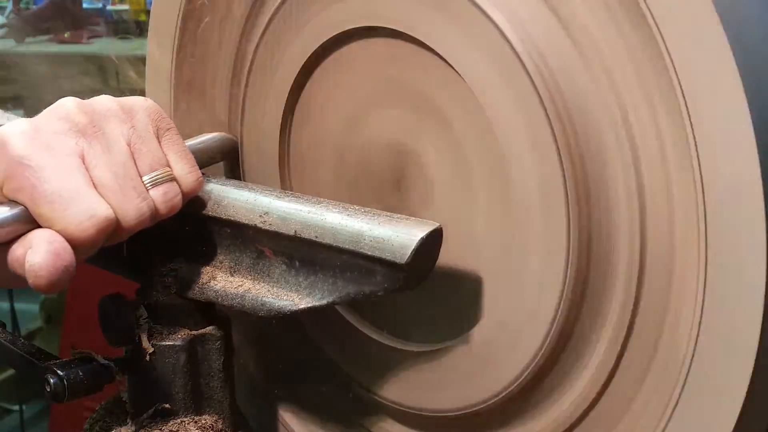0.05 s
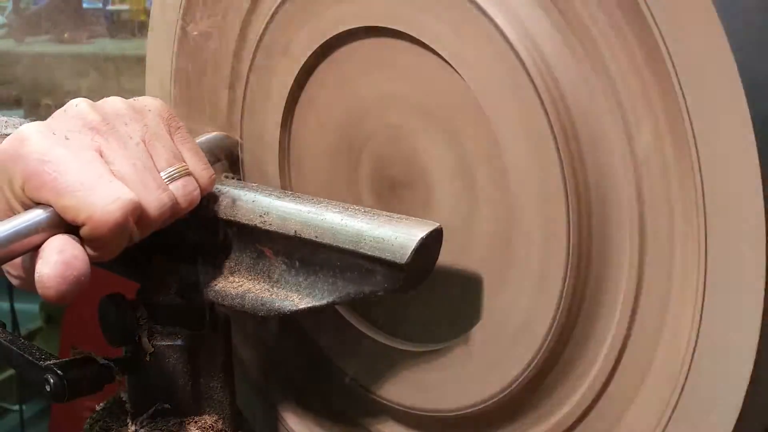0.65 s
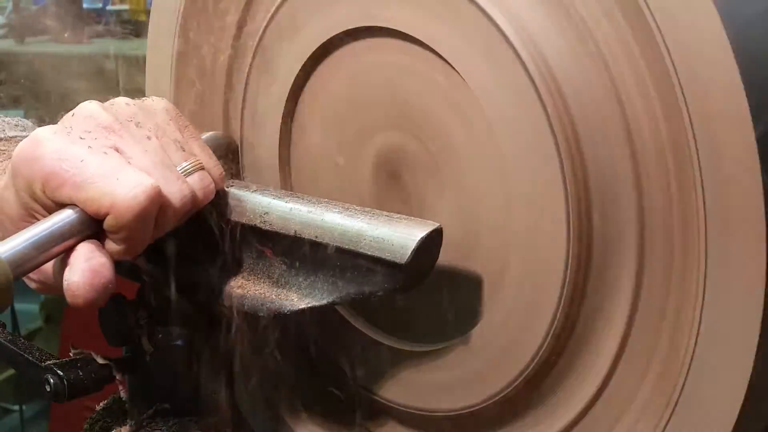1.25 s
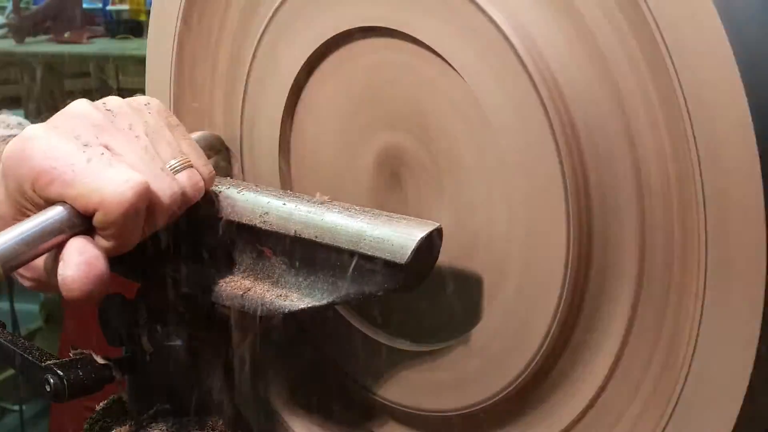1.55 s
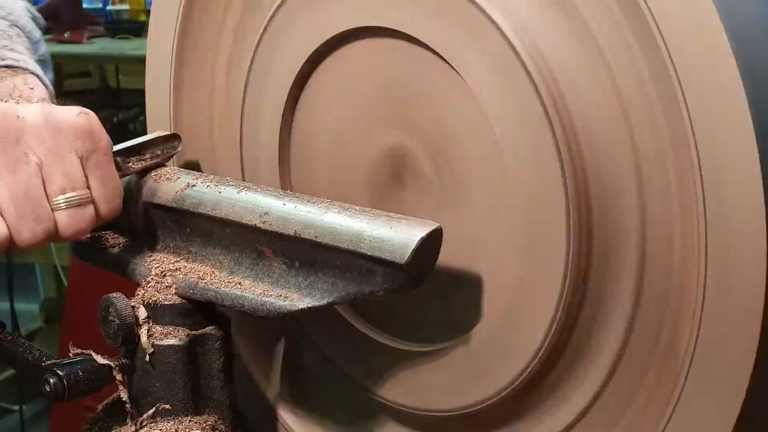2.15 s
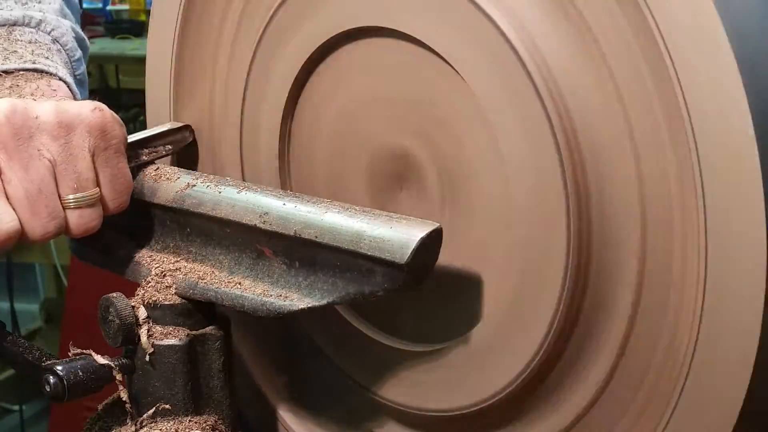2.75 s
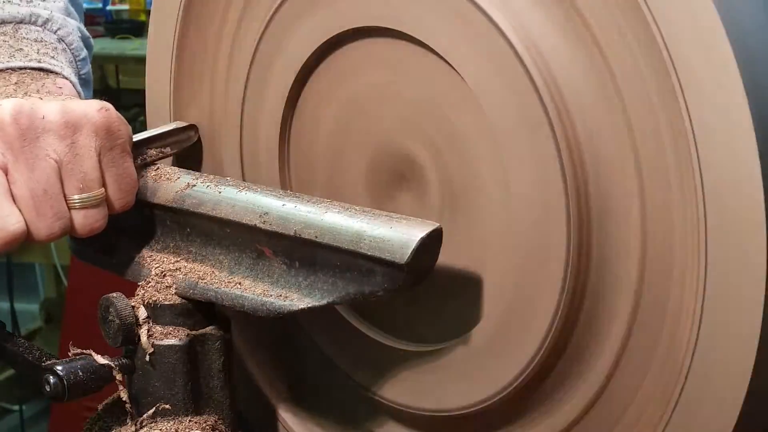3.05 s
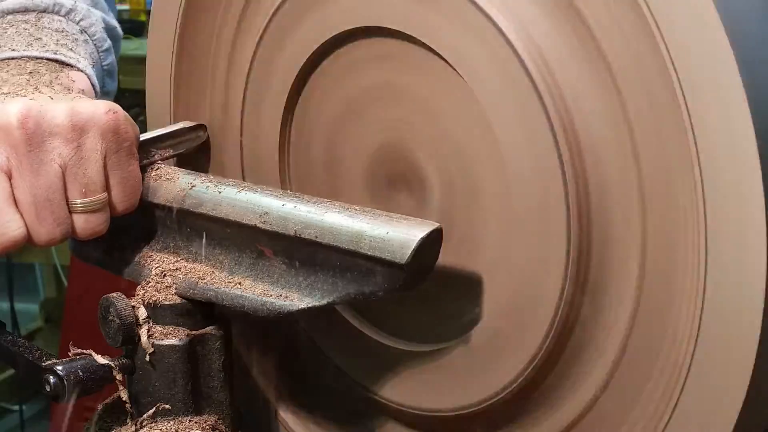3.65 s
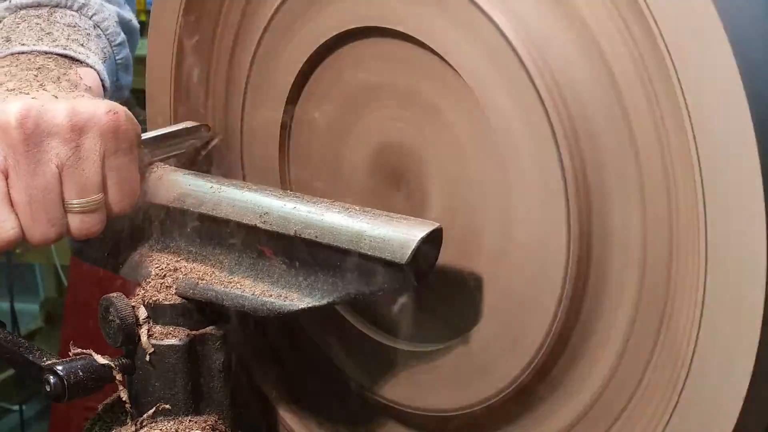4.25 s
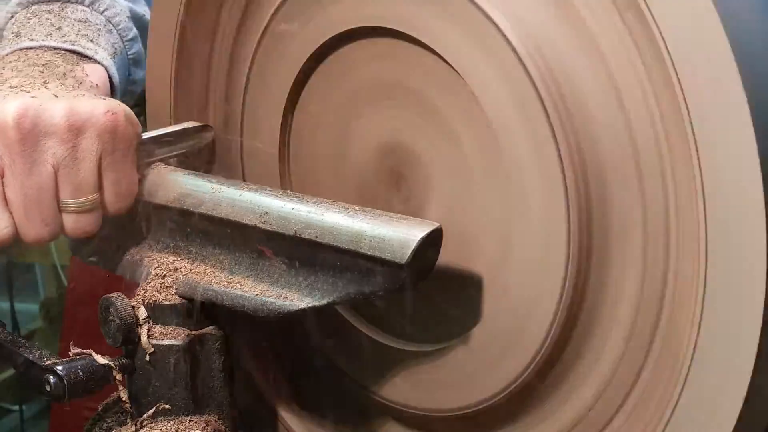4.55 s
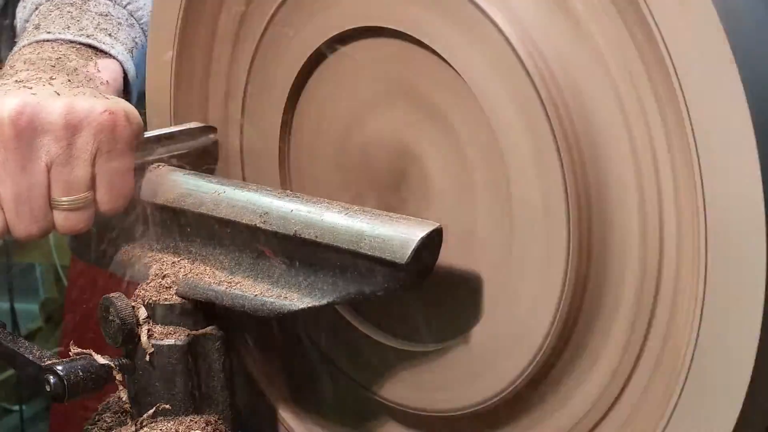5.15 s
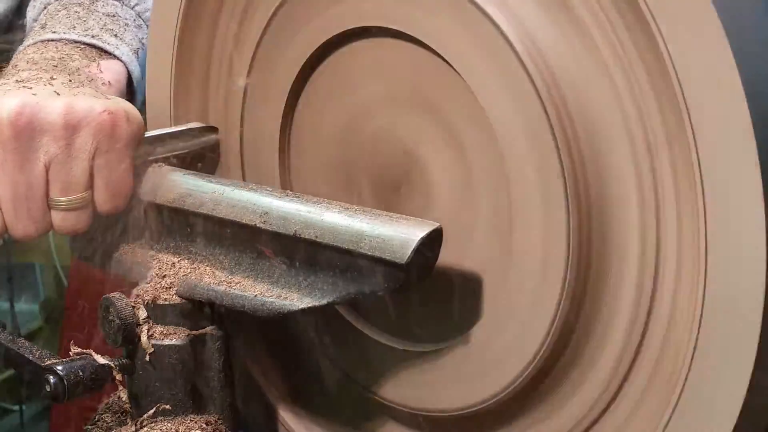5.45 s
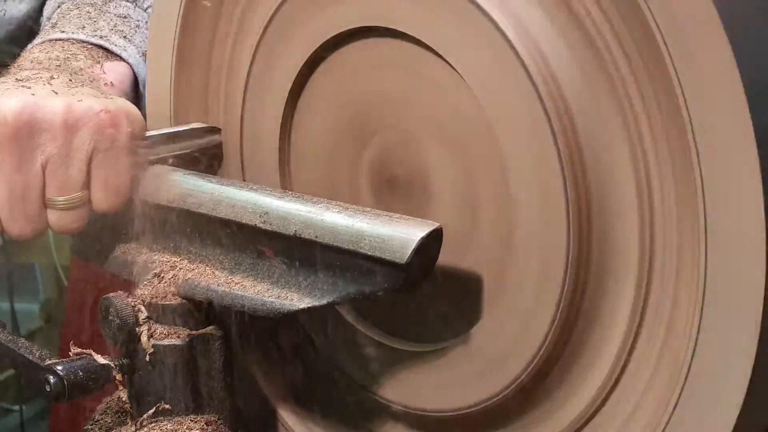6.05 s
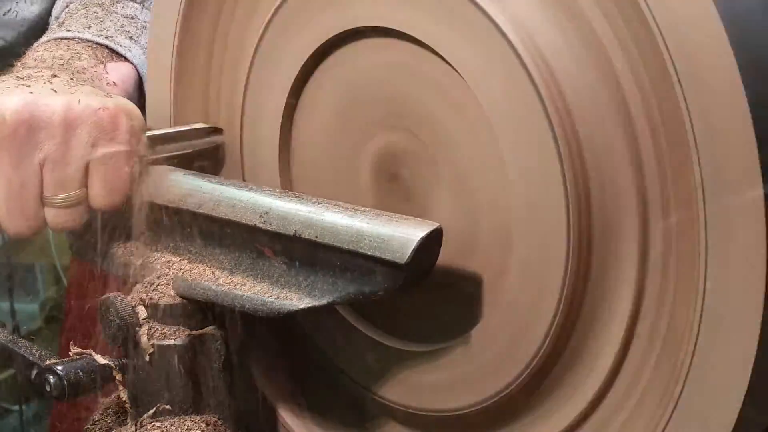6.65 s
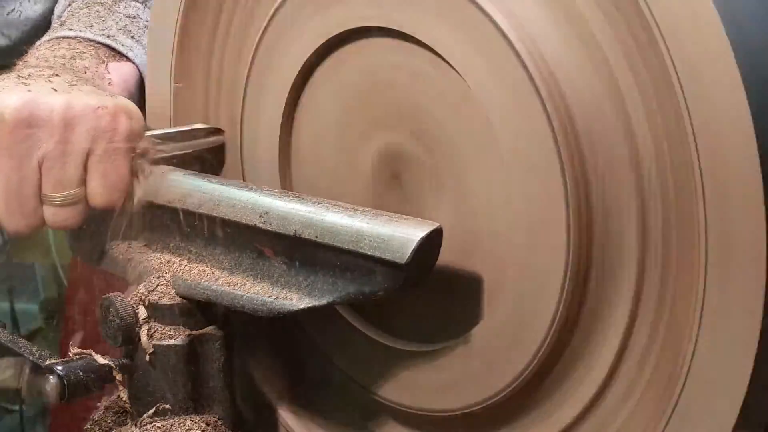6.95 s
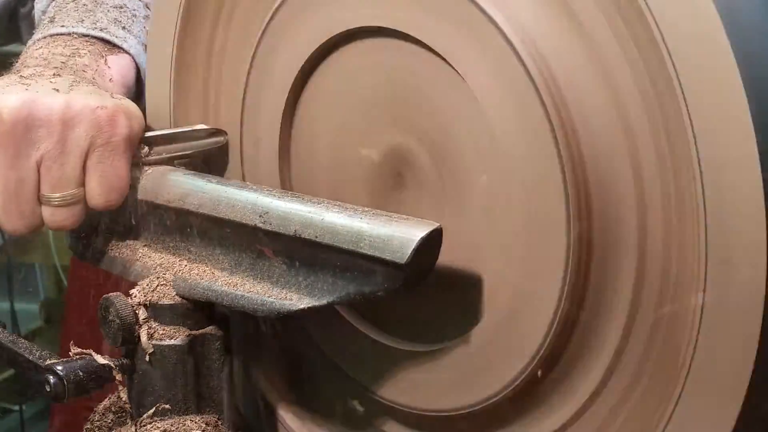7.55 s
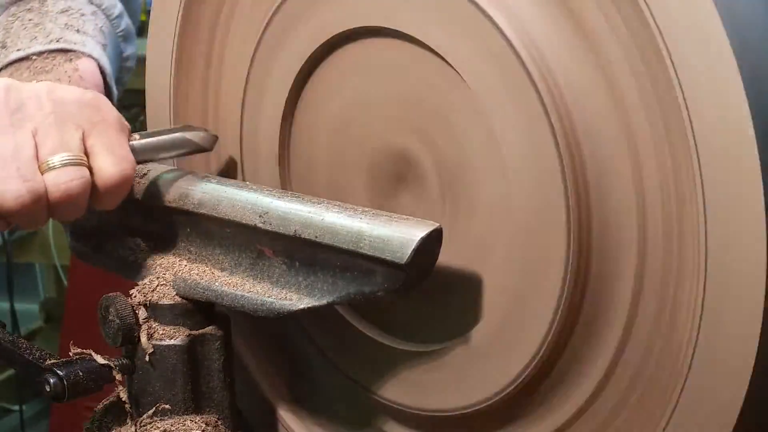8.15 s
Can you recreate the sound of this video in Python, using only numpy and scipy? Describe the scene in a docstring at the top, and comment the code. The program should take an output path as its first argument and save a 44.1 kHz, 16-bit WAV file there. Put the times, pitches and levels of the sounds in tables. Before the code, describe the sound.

A gouge is already cutting a wooden bowl blank on a lathe, close by in a small workshop: a rasping scrape and hiss of shavings, stronger on the left, throbbing rapidly as the wood turns. At about 1.5 seconds the tool lifts with a few light knocks, leaving a faint motor drone and a thin, very high whine. These grow louder around 2.5 seconds as the gouge slides softly along its metal rest. At 2.8 seconds it bumps the wood and starts a longer cut, which chatters with a ringing tone around 4 seconds. Faint squeals swell and fade within the scrape, and the pulsing hiss carries on with a low judder. From about 6.9 seconds rapid ticks join in, until the cut ends near 7.6 seconds. A flying chip hits the microphone with a sharp tick and dull thump at 7.8 seconds, and the motor runs on quietly.

```python
"""A gouge takes two cuts from a big bowl blank spinning on a lathe, close by in a small workshop.
Tearing fibres force the modes of the lathe, wood, tool rest and gouge, and the shaving hisses; the sound
throbs as the rim's hard grain and hollows come round. Stick-slip squeals, and the second cut chatters
briefly and ends in ticks and a flying chip. Between the cuts the tool knocks and slides on the rest.
Under it all the motor drones and its inverter whines."""
import sys
import numpy as np
from scipy import signal
from scipy.fft import rfft, irfft, next_fast_len
from scipy.io import wavfile
from scipy.ndimage import uniform_filter1d, map_coordinates

SR = 44100
rng = np.random.default_rng(int(sys.argv[2]) if len(sys.argv) > 2 else 0)


def inscribe(sig):
    """Save sig as 16-bit PCM at rate SR to the path in sys.argv[1].

    A 1-D sig is mono; a 2-D sig holds one channel per row.
    Samples are clipped to [-1, 1] before scaling.
    """
    pcm = np.round(np.clip(np.atleast_2d(sig).T, -1, 1) * 32767)
    wavfile.write(sys.argv[1], SR, pcm.astype(np.int16))


N = 370866
TIME = np.arange(N) / SR
SIZE = 2 * next_fast_len(N // 2 + SR // 4)
HZ = np.fft.rfftfreq(SIZE, 1 / SR)
SPIN_HZ = 13.14

# the cuts: (start t/s, end t/s, release through 20 dB t/s, turn-to-turn correlation of the surface)
CUTS = [(-.1, 1.468, 0.11, 0.32), (2.776, 7.648, 0.15, 0.78)]
# normal modes: (f/Hz, bandwidth f/Hz, relative level/dB in the first cut, in the second)
BLANK_MODES = [(329, 17.4, 4, -5), (463, 18, 0.5, 0.5), (522, 24, 1, -10.5), (662, 64, -2, -10.5),
               (757, 29, 0, -9), (814.9, 8.6, 6, 2), (960, 87, -3, -9.5)]
REST_MODES = [(1508, 71, -5.5, 0), (1612, 69, -5.5, 2.5), (2210, 210, -10, -9.5), (2501, 210, -4, -1)]
GOUGE_MODES = [(3430, 280, 0, 5.5), (3947, 450, -0.097, -11), (4292, 210, 0.6, 4),
               (4590, 200, -0.89, -25.5)]


def gain_of(db):
    """Amplitude ratio of a level in decibels."""
    return 10 ** (np.asarray(db) / 20)


def unit_rms(x):
    """Normalisation to unit mean power."""
    return x / np.sqrt(np.mean(abs(x) ** 2) + 1e-20)


def bell(middle, half):
    """Gaussian envelope of peak 1."""
    return np.exp(-((TIME - middle) / half) ** 2 / 2)


def ramp(start, length):
    """Linear rise from 0 to 1."""
    return np.clip((TIME - start) / length, 0, 1)


def over_time(rows):
    """Linear interpolation of each column in time."""
    times, *columns = np.transpose(rows)
    return [np.interp(TIME, times, c) for c in columns]


def over_frequency(rows):
    """Interpolation of each column in log frequency."""
    hz, *columns = np.transpose(rows)
    return [np.interp(np.log(HZ + 1), np.log(hz + 1), c) for c in columns]


def filtered(x, response):
    """Convolution as a product of spectra."""
    return irfft(rfft(x, SIZE) * response, SIZE)[..., :N]


def noise(response):
    """Spectrally shaped Gaussian noise of rms 1."""
    return unit_rms(filtered(rng.standard_normal(N), response))


def wander(rate_hz):
    """Low-pass random modulation of rms 1."""
    return noise(1 / (1 + (HZ / rate_hz) ** 4))


def causal(gain):
    """Minimum-phase response of unit power: it rings only after it is struck."""
    cepstrum = irfft(np.log(np.maximum(unit_rms(gain), 1e-5)))
    cepstrum[1:SIZE // 2] *= 2
    cepstrum[SIZE // 2 + 1:] = 0
    return np.exp(rfft(cepstrum))


def body(modes, cut, below=0.8, above=1.34):
    """Modal superposition: resonances add in power, and little radiates outside their range."""
    power = sum(gain_of(db[cut]) ** 2 / (1 + (2 * (HZ - hz) / width) ** 2) for hz, width, *db in modes)
    skirts = 1 + (below * modes[0][0] / (HZ + 1)) ** 16 + (HZ / (above * modes[-1][0])) ** 20
    return causal(np.sqrt(power / skirts))


def resonate(x, hz, width_hz):
    """Forced response, of rms 1, of a resonator whose frequency follows the curve hz."""
    carrier = np.exp(2j * np.pi * np.cumsum(hz) / SR)
    pole = np.exp(-np.pi * width_hz / SR)
    return unit_rms((carrier * signal.lfilter([1], np.poly([pole, pole]), x / carrier)).real)


def per_cut(first, second):
    """A step from one value or curve to the other, midway between the cuts."""
    return np.where(TIME < (CUTS[0][1] + CUTS[1][0]) / 2, first, second)


def contact(lag_s=0, attack_s=0.013):
    """Contact envelope: a quick bite, a hold and a stretched-exponential release."""
    start, end, release = (per_cut(*pair) for pair in list(zip(*CUTS))[:3])
    lifted = (np.maximum(TIME - end - lag_s, 0) / release) ** 0.85
    return ramp(start, attack_s) * gain_of(-20 * lifted)


def turning():
    """Phase in turns: the speed varies slightly under load, so the throb drifts later or earlier."""
    # phase behind a steady spin: (t/s, lag/turns)
    phase_lag = [(.45, 0.0034), (.9, .06), (1.45, 0.11), (2.8, 0.045), (6.3, 0.019), (6.85, 0.07),
                 (7.2, .18), (7.45, 0.31), (7.65, 0.69)]
    return SPIN_HZ * TIME - over_time(phase_lag)[0]


def rim(crossings_s=(2.1, 3.42, 4.05, 5.0, 6.75), blend_s=0.36):
    """Periodic modulation of the force, in dB, as the edge crosses from ring to ring of the wood."""
    # hard end grain and hollows, one curve a ring: (angle/turns, force level/dB)
    rings = [
        [(0, -1), (.11, 0.5), (.25, 3), (.36, -5.5), (.44, -9), (.52, 1), (.58, 5), (.7, -2), (.81, 3.5),
         (.92, -9)],
        [(0, -0.5), (.2, -2.5), (.35, -3), (.42, 4), (.49, -1), (.59, 5.5), (.69, -6), (.8, 0)],
        [(.1, 3), (.3, -1.5), (.41, 7), (.5, -6), (.6, 4.5), (.85, -3.5)],
        [(.05, -3), (.42, 2), (.68, -4), (.84, 0.5)],
        [(.03, -3.5), (.17, 0.5), (.37, 2), (.59, -4.5), (.84, 1)],
        [(.16, -12.5), (.3, -2.5), (.52, -2.5), (.75, -1), (.9, -1.5)],
    ]
    angle = turning()
    db, *later = (np.interp(angle, *np.transpose(ring), period=1) for ring in rings)
    for s, ring_db in zip(crossings_s, later):
        db = db + (ring_db - db) * ramp(s, blend_s)
    return db


def revolve(fresh, kept):
    """Regeneration: the surface returns after one turn, partly renewed by the cut."""
    period, surface = round(SR / SPIN_HZ), fresh.copy()
    kept = np.clip(kept, 0, 0.98)
    for start in range(period, N, period):
        now = np.arange(start, min(start + period, N))
        surface[now] = kept[now] * surface[now - period] + np.sqrt(1 - kept[now] ** 2) * fresh[now]
    return surface


def bite(lump_db=1.0, rasp_db=0.3, clump_db=0.8):
    """Fine modulation of the force: lumps and a rasp that recur each turn, fresh clumps, and grazes."""
    # the edge skips out of the chatter, then grazes as it lifts: (t/s, half length t/s, level/dB)
    grazes = [(4.126, 0.01, -10), (7.447, .008, 6.5), (7.531, .007, 9), (7.565, 0.0053, 9.5),
              (7.616, 0.003, 8), (7.647, .005, 5)]
    recurring_db = revolve(lump_db * wander(61) + rasp_db * wander(340), kept=np.full(N, 0.88))
    graze_db = sum(db * bell(s, half) for s, half, db in grazes)
    return gain_of(recurring_db + clump_db * wander(440) + graze_db)


def fibres(snaps_per_s=2500, spread_db=2.5, snap_share=0.3):
    """Fracture noise: dense tearing plus the shot noise of coarser fibres snapping."""
    size = gain_of(spread_db * np.minimum(rng.exponential(1, N), 5))
    snaps = size * rng.choice([-1, 1], N) * (rng.random(N) < snaps_per_s / SR)
    return np.sqrt(snap_share) * unit_rms(snaps) + np.sqrt(1 - snap_share) * rng.standard_normal(N)


def curl(x, drift_db=2.5, flicker_db=2.0):
    """Spectral modulation: the shaving's changing curl moves bright patches through the hiss."""
    spectra = signal.stft(x, SR, nperseg=512)[2]
    slow, fast = rng.standard_normal((2, *spectra.shape))
    slow = unit_rms(uniform_filter1d(uniform_filter1d(slow, size=5, axis=0), size=50, axis=1))
    fast = unit_rms(uniform_filter1d(uniform_filter1d(fast, size=4, axis=0), size=4, axis=1))
    colour = gain_of(drift_db * slow + flicker_db * fast)
    colour /= np.sqrt(np.mean(colour ** 2, axis=0))
    return unit_rms(signal.istft(spectra * colour, nperseg=512)[1][:N])


def parts(cut):
    """Transfer functions of the lathe, blank, tool rest, gouge and shaving in one cut."""
    # normal modes: (f/Hz, bandwidth f/Hz, relative level/dB in the first cut, in the second)
    lathe_modes = [(79, 3.1, -3.5, -0.5), (155, 14.4, 7, 6.5), (257.6, 31, -1, -11.5)]
    # the shaving's hiss, one spectrum a cut: (f/Hz, density level/dB)
    hiss_spectra = [
        [(2880, -34), (4900, -19.5), (5230, -14), (5600, -4), (7250, -4), (12400, -6.5), (15000, -7.5),
         (16000, -3.5)],
        [(2880, -37.5), (4900, -11), (5800, -0.5), (6340, -7), (6860, 0.5), (7540, -5), (10300, -3.5),
         (13000, -6), (15300, -0.5)],
    ]
    return [body(lathe_modes, cut), body(BLANK_MODES, cut), body(REST_MODES, cut, above=0.98),
            body(GOUGE_MODES, cut, below=0.84), causal(gain_of(over_frequency(hiss_spectra[cut])[0]))]


def grip(x, sway_s=0.00013):
    """Delay modulation: the shifting hand makes the steel's ring, and reflections past it, waver."""
    return map_coordinates(x, [SR * (TIME + sway_s * wander(10.9))], mode="nearest")


def cutting(usual_db=-30, firm_db=-9, bounce_db=-7.5, judder_hz=229.6, judder_rise_hz=10.2):
    """Forced vibration: surface ripples shake the heavy parts, finer tearing the steel and shaving."""
    # the turner's hand, one curve a cut: (t/s, bevel pressure level/dB, shaving thickness level/dB)
    hand = [
        [(0.02, -34.5, -22), (0.464, -42.5, -26), (1.42, -37.5, -23.5), (1.5, -27, -27.5)],
        [(2.8, -32, -40.5), (3.0, -24.5, -33), (3.43, -22.5, -30), (3.81, -20, -29.5), (3.93, -23.5, -24.5),
         (4.05, -25.5, -26), (4.91, -32, -27), (5.28, -28.5, -24.5), (6.89, -32, -26), (7.04, -35.5, -32),
         (7.5, -40.5, -32.5), (7.62, -41, -34)],
    ]
    # rows: lathe thrum, blank ring, rest ring, gouge scrape, shaving hiss, gouge judder
    # (usual level/dB in the first cut, in the second, dB per dB of pressure, dB per dB of thickness,
    # change in chatter/dB, change at full reach/dB, share of the rim's swing)
    sensitivities = [(-36.5, -46.5, 0.98, 0, -1.5, 10, 0.14), (-32.5, -31.5, 1.01, 0, 2, 0, 0.46),
                     (-30.5, -32.5, 0.92, 0.3738, -6.5, 4, 0.95), (-28.5, -31.5, 0, 0.7744, -2.5, 2, 1.13),
                     (-29.5, -27.5, 0, 1.17, 1, -0.5, 0.42), (-46, -50.5, 1, 0.5, -4, 17.5, .2)]
    pressure_db, thickness_db = per_cut(over_time(hand[0]), over_time(hand[1])) - usual_db
    chatter = bell(3.894, 0.29)  # the edge rides in its own ripples
    reach = ramp(5.34, 1.6)  # the gouge is fed further out over the rest
    # in the first cut a lighter hand lets the rim throw the edge about more
    swing_db = rim() * per_cut(gain_of(0.5 * (firm_db - pressure_db)), 0.92)
    thrum, ring, rest, scrape, hiss, judder = (
        gain_of(per_cut(first, second) + pressed * pressure_db + fed * thickness_db
                + chatter_db * chatter + reach_db * reach + swung * swing_db)
        for first, second, pressed, fed, chatter_db, reach_db, swung in sensitivities)
    kept = (1 - chatter) * per_cut(CUTS[0][3], CUTS[1][3]) + chatter
    force = unit_rms(bite())
    edge, bevel = contact(), contact(lag_s=0.0036)  # the bevel leaves the wood just after the edge
    low_side = abs(np.cos(np.pi * (turning() - 0.32))) ** 7
    bounce = gain_of(bounce_db * chatter * low_side)  # in chatter the bevel loses touch once a turn
    ripples = revolve(fibres(), kept) * force * bounce
    tearing = revolve(fibres(), 0.64 * kept) * force
    fizz = curl(fibres()) * force
    drives = [thrum * bevel * ripples, ring * bevel * ripples,
              rest * edge * tearing, scrape * edge * tearing, hiss * edge * fizz]
    overhang_hz = judder_hz + judder_rise_hz * reach  # resonance of the overhanging gouge
    sound = judder * bevel * resonate(ripples, overhang_hz, width_hz=50)
    sound += edge * squeals(fibres() * force * gain_of(swing_db))
    sound += ring * chatter * np.sqrt(bounce) * chatter_notes()
    for cut in range(len(CUTS)):
        active = per_cut(0, 1) == cut
        lathe, blank, tool_rest, gouge, shaving = (
            filtered(drive * active, part) for drive, part in zip(drives, parts(cut)))
        sound += lathe + blank + grip(tool_rest + gouge) + shaving
    return sound


def recorder_gain(start_db=-1.5, rise_db=21, rise_at_s=2.364, rise_s=0.54, fall_db_per_s=3.5):
    """Gain curve for the steady sounds: the recorder's gain rises in the pause, then slowly falls."""
    fallen_db = fall_db_per_s * np.maximum(TIME - rise_at_s - rise_s, 0)
    return gain_of(start_db + rise_db * ramp(rise_at_s, rise_s) - fallen_db)


def motor(rumble_db=-60):
    """Steady machine noise: a drone of bearing rumble and hum, and the whine, at the recorder's gain."""
    # bearing rumble: (f/Hz, density level/dB)
    rumble_spectrum = [(20, -21), (85, -1.5), (220, -6.5), (950, -11.5), (2700, -30), (4000, -25),
                       (9000, -44.5)]
    # motor tones: (f/Hz, relative level/dB)
    hum_tones = [(236.9, -68.5), (463.0, -69)]
    rumble = gain_of(rumble_db) * noise(gain_of(over_frequency(rumble_spectrum)[0]))
    hum = sum(gain_of(db) * np.sin(2 * np.pi * hz * TIME + wander(4.2)) for hz, db in hum_tones)
    gain = recorder_gain()
    return gain * (rumble + np.sqrt(2) * hum), gain * inverter()


def inverter(switching_hz=14011, step_hz=136.6, count=18, core_db=-66, side_db=-86, hiss_db=-69):
    """Modulation sidebands: a comb of tones round the switching frequency, in a band of hiss."""
    jitter = 0.5 * wander(40)
    tones = np.zeros(N)
    for k in np.arange(count) - (count - 1) / 2:
        cycles = (switching_hz + k * step_hz) * TIME + rng.random()
        tones += gain_of(core_db if abs(k) < 2 else side_db) * np.sin(2 * np.pi * cycles + jitter)
    hiss = noise(1 / (1 + ((HZ - 14300) / 1600) ** 20))
    return np.sqrt(2) * tones + gain_of(hiss_db) * hiss


def squeals(tearing):
    """Stick-slip friction: single resonances swell out of the scrape, glide a little and fade."""
    # (middle t/s, half length t/s, f/Hz, glide/(Hz/s), bandwidth f/Hz, level/dB)
    resonances = [(0.493, 0.25, 7630, -100, 1300, -29.5), (3.007, 0.2, 480, -30, 90, -30),
                  (4.073, 0.37, 10200, 1206, 1500, -33.5), (4.776, 0.23, 4040, 297, 766.8, -27),
                  (6.144, 0.48, 6900, -0.5, 1300, -33)]
    return sum(gain_of(db) * bell(s, half)
               * resonate(tearing, hz + glide * np.clip(TIME - s, -1, 1), width)
               for s, half, hz, glide, width, db in resonances)


def knocks(blank_db=-4, rest_db=-6, tick_db=-8):
    """Impact excitation: short rattling blows ring the modes of wood and steel."""
    # the gouge lifts and meets the wood again: (t/s, level/dB, decay t/s, relative treble level/dB)
    impacts = [(1.496, -21.5, 0.005, -8.5), (1.646, -32.5, 0.0026, -15), (1.653, -21, 0.0087, -18),
               (1.684, -31, 0.0037, -9), (1.729, -39.5, 0.016, -4.5), (2.781, -22, 0.0026, -22)]
    blows, bright = np.zeros((2, N))
    for s, db, decay, treble_db in impacts:
        blow = gain_of(db) * (TIME >= s) * np.exp(-abs(TIME - s) / decay) * rng.standard_normal(N)
        blows += blow
        bright += gain_of(treble_db) * blow
    wood = gain_of(blank_db) * (body(BLANK_MODES, 0) + body(BLANK_MODES[-2:], 0))
    rest = gain_of(rest_db) * body(REST_MODES[:2], 0)
    clink = body(REST_MODES[2:], 0) + body(GOUGE_MODES[:1], 0) + gain_of(tick_db)
    return filtered(blows, wood + rest) + filtered(bright, clink)


def bumps(note_hz=464, rise_s=0.0058, decay_s=0.12):
    """Damped free vibration: the blank's main note starts quickly and dies away."""
    # the bevel bumps the blank: (t/s, level/dB)
    impacts = [(1.497, -40.5), (2.779, -26.5), (2.856, -27)]
    envelope = sum(gain_of(db) * ramp(s, rise_s) * np.exp(-abs(TIME - s) / decay_s) for s, db in impacts)
    return envelope * np.sin(2 * np.pi * note_hz * TIME)


def slide(uneven_db=1.3):
    """Sliding friction: the gouge rubs softly along the rest."""
    # steel on steel: (f/Hz, density level/dB)
    rub_spectrum = [(400, -6), (900, 1.5), (4500, -2.5), (12000, -8), (16000, -18)]
    # movements of the gouge: (middle t/s, half length t/s, level/dB)
    strokes = [(2.586, 0.083, -50.5), (7.82, 0.026, -53)]
    rub = noise(gain_of(over_frequency(rub_spectrum)[0]))
    envelope = sum(gain_of(db) * bell(s, half) for s, half, db in strokes)
    return rub * gain_of(uneven_db * wander(40)) * envelope


def chatter_notes(waver_rad=0.45):
    """Regenerative chatter: the blank sings, almost steady, at a whole number of ripples a turn."""
    # locked modes: (f/Hz, level/dB relative to the blank's ring)
    notes = [(460, -10.5), (815, -2)]
    return np.sqrt(2) * sum(gain_of(db) * np.sin(2 * np.pi * hz * TIME + waver_rad * wander(10))
                            for hz, db in notes)


def ticks(first_s=6.9175, spacing_s=0.0789, count=8, level_db=-20, ring_db=-4, decay_s=0.005):
    """Periodic impacts: as the cut thins, a high spot cracks against the edge and rings the gouge."""
    turn, since = np.divmod(TIME - first_s, spacing_s)
    snaps = (turn >= 0) * (turn < count) * np.exp(-since / decay_s) * rng.standard_normal(N)
    return gain_of(level_db) * (snaps + filtered(snaps, gain_of(ring_db) * body(GOUGE_MODES, 1)))


def chip(s=7.7683, thump_db=-14, thump_hz=190, thump_decay_s=0.0035,
         tick_db=-4, tick_hz=3700, tick_decay_s=0.00014):
    """Impact transient: a flying chip hits the left microphone port, a tick on a dull thump."""
    t = np.maximum(TIME - s, 0)
    push = gain_of(thump_db) * np.sin(2 * np.pi * thump_hz * t) * np.exp(-t / thump_decay_s)
    thump = -np.gradient(push) * SR / (2 * np.pi * thump_hz)  # sound follows the speed of the push
    tick = gain_of(tick_db) * np.cos(2 * np.pi * tick_hz * t) * np.exp(-t / tick_decay_s) * (TIME >= s)
    return (thump + tick) * gain_of([[0], [-27]])


def reflections(t60, treble_t60, delay_s, echoes_per_s=4000):
    """Reverberation: sparse echoes of unit energy whose decay time depends on frequency."""
    count = SR // 2
    taps = rng.choice([-1., 1.], count) * (rng.random(count) < echoes_per_s / SR)
    taps *= np.arange(count) > delay_s * SR
    hz, t, spectra = signal.stft(taps, SR, nperseg=256)
    decay_s = np.interp(hz, [500, 10000], [t60, treble_t60])[:, None]
    echoes = signal.istft(spectra * gain_of(-60 * t / decay_s), nperseg=256)[1]
    return unit_rms(rfft(echoes, SIZE))


def workshop(x, wet_db=-12, lags_s=(0.00024, 0.0001)):
    """Acoustic shadow: the left port faces the cut; the right lags and gets treble mostly as echoes."""
    # the two microphone ports: (f/Hz, left minus right level/dB, coherence)
    ports = [(125.9, -3, 0.95), (254, 1.5, 0.91), (523, 7, 0.96), (953, 3.5, 0.47), (1580, 7.5, 0.093),
             (4170, 19, 0.44), (8290, 28.5, 0.2), (13200, -1, 0.02)]
    lean_db, coherence = over_frequency(ports)
    shade = gain_of(-lean_db)
    # gain of the two ports' mean, divided out of both
    centre = np.sqrt(1 + 2 * coherence * shade * np.cos(2 * np.pi * HZ * lags_s[1]) + shade ** 2) / 2
    room = gain_of(wet_db) * reflections(t60=0.13, treble_t60=0.052, delay_s=0.003)
    left = filtered(x, (1 + room) / centre)
    late = np.interp(TIME - per_cut(*lags_s), TIME, x)
    diffuse = np.sqrt(1 - coherence ** 2) * reflections(t60=0.04, treble_t60=0.065, delay_s=0.0005)
    right = filtered(late, shade * coherence / centre) + filtered(grip(x), shade * diffuse / centre)
    return np.array([left, right])


def scene():
    """Superposition: the lathe heard through the room, the whine from further right, and the chip."""
    drone, whine = motor()
    at_lathe = cutting() + ticks() + bumps() + knocks() + slide() + drone
    return workshop(at_lathe) + whine * gain_of([[-6], [3.5]]) + chip()


def record(dry):
    """Band limiting by a steep linear-phase low-pass filter."""
    low_pass = signal.firwin(511, cutoff=15950, window=("kaiser", 9), fs=SR)
    return signal.oaconvolve(dry, low_pass[None], "same")


dry = scene()
out = record(dry)
inscribe(out)
```